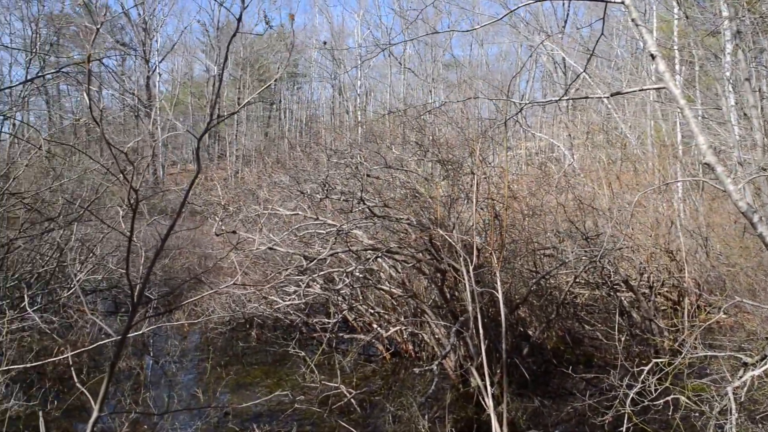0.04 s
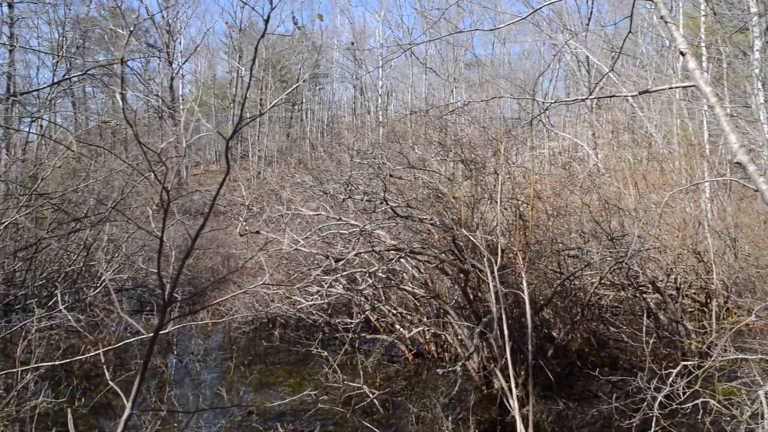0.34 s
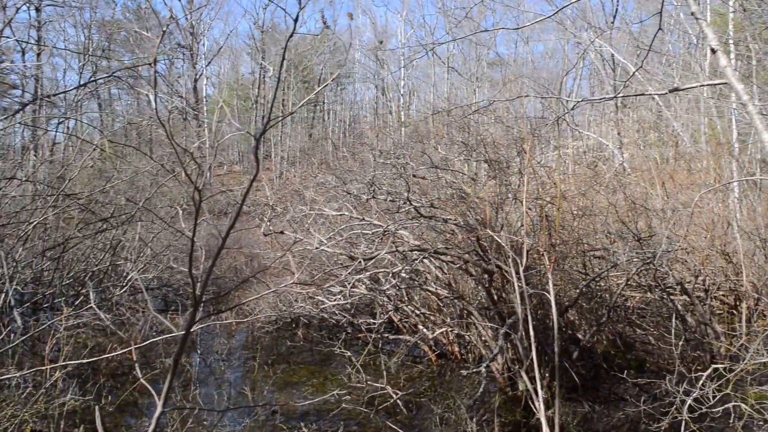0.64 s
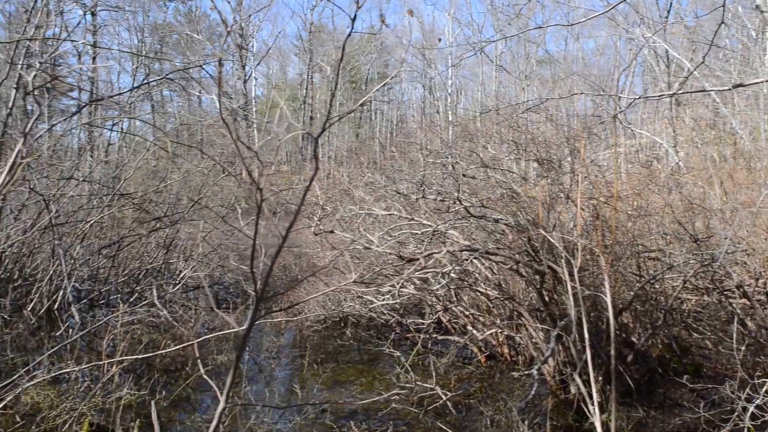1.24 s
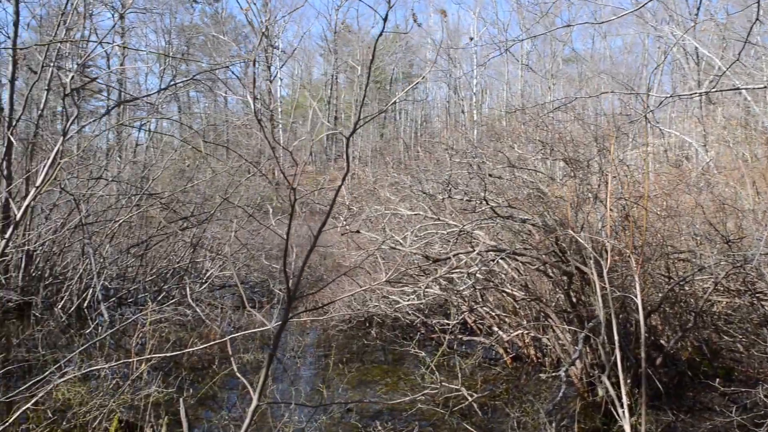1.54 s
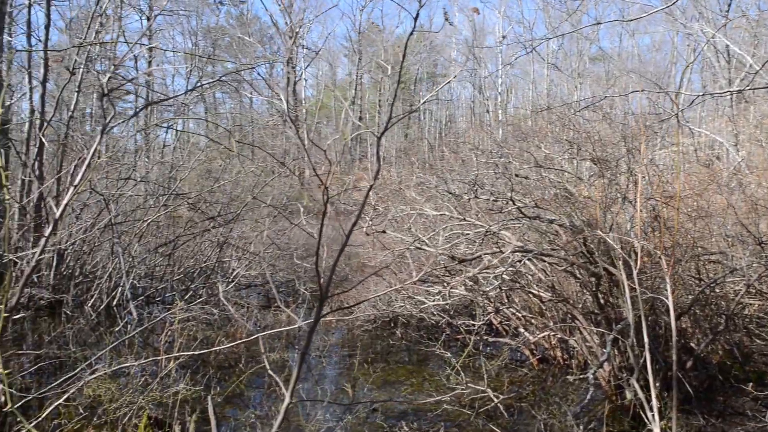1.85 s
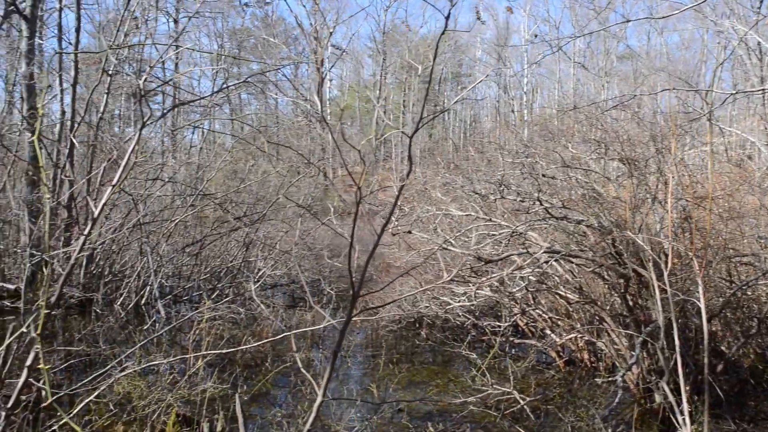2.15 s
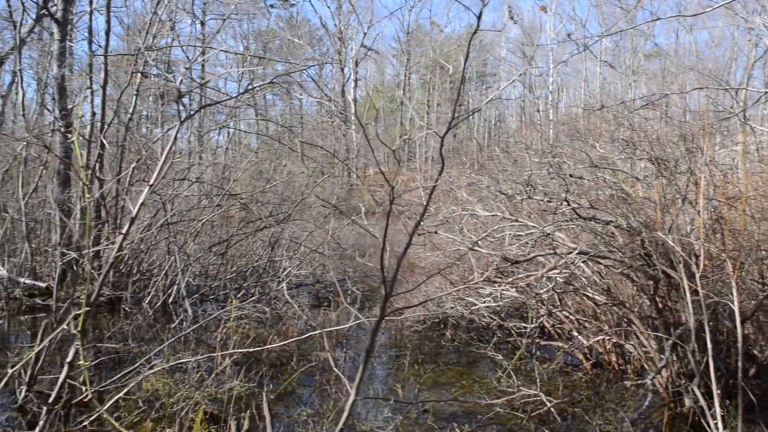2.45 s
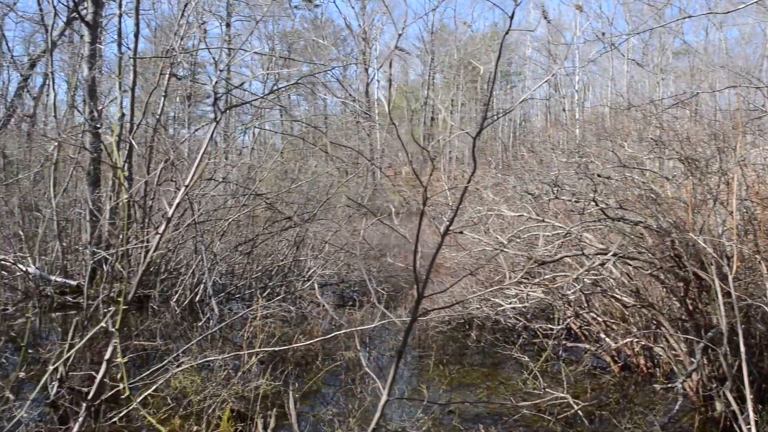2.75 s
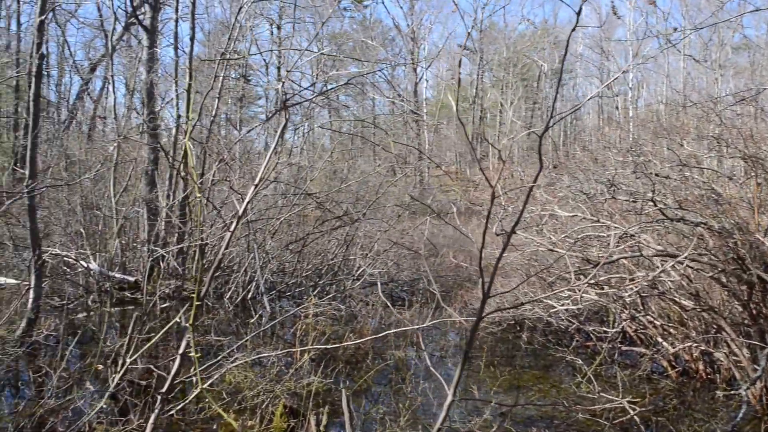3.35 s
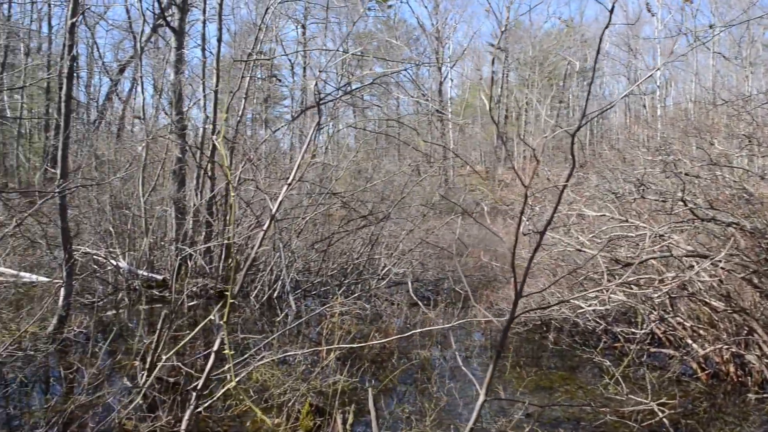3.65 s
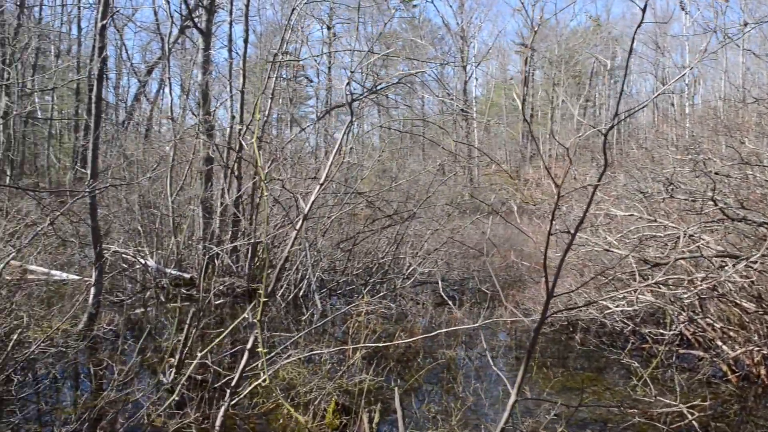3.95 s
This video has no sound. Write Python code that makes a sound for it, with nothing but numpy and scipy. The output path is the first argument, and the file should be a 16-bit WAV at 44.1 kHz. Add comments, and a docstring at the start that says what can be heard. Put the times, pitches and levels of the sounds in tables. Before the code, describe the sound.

Many frogs quack and croak continuously in a woodland pool, close calls overlapping a more distant chorus. A soft microphone bump comes at the start, and a few thin squeaks and faint twig ticks fall among the calls.

```python
"""A chorus of frogs quacks in a woodland pool, with one soft bump on the microphone as it begins.
Each quack is a quickening train of clicks that excites damped resonances: a thin rattle leads in,
the throat rings out, then the vocal sacs swell. Thin squeaks fall among the calls, more frogs call
farther off, and the trees scatter the chorus into reverberation. A few twigs tick, and a faint
rumble and hiss lie underneath."""
import sys
import numpy as np
from scipy import signal
from scipy.fft import rfft, irfft, next_fast_len
from scipy.io import wavfile

SR = 44100
rng = np.random.default_rng(int(sys.argv[2]) if len(sys.argv) > 2 else 0)


def int16_out(signal):
    """Quantize to a 16-bit WAV file."""
    q = np.round(np.clip(np.atleast_2d(signal).T, -1, 1) * 32767)
    wavfile.write(sys.argv[1], SR, q.astype(np.int16))


N = 176400
CALL_T = np.arange(-int(.07 * SR), int(.09 * SR)) / SR  # seconds from a quack's loudest moment
SLOW_HZ, FAST_HZ = 156.08, 390.5  # click rate early and late in a typical quack

# Near quacks, levels relative; the last two resonances are the vocal sacs and the rattle:
# peak_s, length_s, level_db, throat_hz, sac_hz, sac_re_throat_db, rattle_hz, rattle_db
NEAR_QUACKS = [(0.011, 0.034, -34, 1460, 666, -3.5, 4970, -60),
               (0.059, 0.024, -27, 1440, 720, -11.5, 4960, -63),
               (0.106, 0.024, -36, 1680, 830, -1, 5000, -68),
               (0.152, 0.028, -31, 1650, 805, -2.5, 5650, -65),
               (0.19, 0.031, -30.5, 1690, 795, -2.5, 5350, -61),
               (0.245, 0.012, -27.5, 1500, 660, -17, 5200, -60),
               (0.296, 0.015, -28.5, 1390, 784, -7, 4830, -54),
               (0.331, 0.02, -28.5, 1380, 772, -4.5, 5360, -61),
               (0.353, 0.027, -30, 1480, 740, -9, 4860, -61),
               (0.406, 0.019, -33, 1730, 804, -18, 4870, -69),
               (0.48, 0.012, -34, 1520, 785, -0.5, 4900, -64),
               (0.564, 0.012, -26, 1240, 720, -17, 5300, -70),
               (0.587, 0.025, -27.5, 1550, 720, -6, 5550, -60),
               (0.657, 0.015, -26, 1520, 734, -9, 4930, -58),
               (0.686, 0.024, -29.5, 1590, 735, -10.5, 5100, -61),
               (0.727, 0.039, -31, 1580, 767, -10, 5780, -57),
               (0.748, 0.029, -28, 1630, 780, -4.5, 5630, -66),
               (0.768, 0.018, -27, 1580, 770, -13, 5330, -56.5),
               (0.936, 0.028, -30, 1475, 682, 0, 4580, -53.5),
               (0.978, 0.029, -28.5, 1370, 767, -9.5, 5450, -61),
               (1.074, 0.016, -27, 1400, 734, -4, 5000, -58),
               (1.101, 0.025, -32, 1510, 790, -25, 4540, -58),
               (1.139, 0.016, -31, 1330, 617, -11.5, 4800, -60),
               (1.194, 0.021, -27, 1675, 800, -7, 5100, -53.5),
               (1.253, 0.035, -33, 1400, 750, -9, 5460, -61),
               (1.289, 0.021, -26.5, 1530, 780, -10, 5900, -57),
               (1.445, 0.017, -29.5, 1400, 734, -4, 5100, -78),
               (1.476, 0.017, -29, 1400, 665, -3.5, 5000, -57),
               (1.497, 0.023, -29.5, 1540, 785, -4, 5100, -58),
               (1.587, 0.035, -30, 1690, 660, -14, 5450, -67),
               (1.614, 0.025, -29, 1580, 636, -20, 5200, -54.5),
               (1.692, 0.034, -23, 1596, 760, -7.5, 5260, -48),
               (1.741, 0.016, -27.5, 1550, 770, -6, 5460, -62),
               (1.77, 0.018, -32.5, 1350, 760, -17, 5200, -65),
               (1.823, 0.043, -28, 1440, 790, -15, 5060, -64),
               (1.854, 0.037, -32, 1550, 810, -19, 5300, -64),
               (1.874, 0.027, -27.5, 1650, 825, -17, 5700, -58.5),
               (1.944, 0.047, -32.5, 1575, 760, -6, 5400, -66),
               (2.004, 0.014, -30, 1420, 780, -3, 5650, -66),
               (2.073, 0.032, -36.5, 1590, 675, -5.5, 5070, -78),
               (2.18, 0.017, -25.5, 1570, 790, -7, 6140, -56.5),
               (2.206, 0.016, -23.5, 1390, 744, -8, 6140, -53),
               (2.254, 0.022, -22.5, 1510, 810, -6, 5030, -52),
               (2.297, 0.022, -27.5, 1400, 800, -32, 5500, -60),
               (2.366, 0.02, -20.5, 1760, 808, -8.5, 5430, -43.5),
               (2.44, 0.0089, -26.5, 1470, 756, -7, 4900, -53),
               (2.475, 0.066, -35.5, 1570, 800, -7.5, 5320, -64),
               (2.549, 0.063, -34, 1490, 814, -7, 5650, -78),
               (2.623, 0.048, -33.5, 1680, 806, -3, 4800, -61),
               (2.66, 0.022, -24.5, 1590, 794, -6.5, 5960, -51),
               (2.733, 0.037, -28, 1190, 800, -11.5, 5200, -61.5),
               (2.821, 0.04, -30.5, 1580, 740, -7.5, 5230, -60),
               (2.91, 0.039, -26, 1683, 750, -6.5, 6000, -51.5),
               (2.931, 0.012, -31, 1600, 820, -3, 5670, -66),
               (2.968, 0.014, -30.5, 1700, 766, -5, 5040, -57),
               (3.049, 0.076, -32.5, 1610, 794, -10.5, 5400, -66),
               (3.089, 0.02, -23, 1450, 840, -11.5, 5760, -53),
               (3.168, 0.026, -25, 1744, 825, -7.5, 5550, -46),
               (3.22, 0.0091, -28, 1510, 890, -8, 5300, -70), (3.264, 0.013, -32, 1610, 810, -7, 5440, -72),
               (3.301, 0.025, -31, 1985, 805, -9, 5320, -60),
               (3.377, 0.025, -32, 1730, 818, -1.5, 5270, -63),
               (3.471, 0.013, -32.5, 1540, 815, 1.5, 5300, -75),
               (3.513, 0.028, -28.5, 1464, 757, -7, 5970, -57.5),
               (3.579, 0.017, -27, 1635, 837, -6.5, 5500, -52.5),
               (3.608, 0.02, -31, 1670, 750, -7, 5900, -57),
               (3.655, 0.022, -23.5, 1720, 800, -6, 5830, -49),
               (3.723, 0.011, -27, 1810, 830, -6, 5200, -53),
               (3.779, 0.023, -29.5, 1750, 820, -4, 4800, -65),
               (3.885, 0.028, -31, 1690, 784, -1, 5350, -58), (3.975, 0.098, -32, 1500, 750, -5, 5100, -65)]


def near_frogs(echo_t60_s=0.047, echo_db=-9):
    """Early reflections: stems and bank add a short scatter to each close call, its energy held equal."""
    out, t = np.zeros(N), np.arange(SR // 20) / SR
    for peak_s, *voice in NEAR_QUACKS:
        call = quack(*voice)
        scatter = rng.standard_normal(len(t)) * np.exp(-np.log(1000) * t / echo_t60_s)
        echo = signal.fftconvolve(call, scatter / np.linalg.norm(scatter))[:len(call)]
        heard = call + amp(echo_db) * echo
        add(out, peak_s + CALL_T[0], heard * np.linalg.norm(call) / np.linalg.norm(heard))
    return amp(-1.7) * out


def quack(length_s, level_db, throat_hz, sac_hz, sac_re_throat_db, rattle_hz, rattle_db):
    """Source and filter: one quickening click train drives the rattle, the throat and the sacs in turn."""
    quicken_s, quicken_lead_s, click_lead_s, sac_lag_s = .004, 0.002021, .002, 0.0031
    rise_s, fall_s = 0.59 * length_s, 0.74 * length_s
    quickening = (1 + np.tanh((CALL_T + quicken_lead_s) / (2 * quicken_s))) / 2
    rate_hz = (SLOW_HZ + (FAST_HZ - SLOW_HZ) * quickening) * np.exp(.07 * rng.standard_normal())
    times = click_train(rate_hz, -CALL_T[0] - click_lead_s)
    t = times + CALL_T[0] + click_lead_s  # click times from the peak of effort
    force = amp(1.2 * rng.standard_normal(size=128))[:len(t)]
    effort = np.exp(-np.where(t < 0, (t / rise_s) ** 4, np.abs(t / fall_s) ** 1.6))
    inflation = np.interp(t - sac_lag_s, CALL_T, quickening)
    body = throat(times, t, force * effort, throat_hz, inflation)
    sacs = vocal_sacs(times, t - sac_lag_s, force, sac_hz, rise_s, fall_s)
    call = amp(level_db) * (body - amp(sac_re_throat_db) * sacs)
    call += amp(rattle_db + 5) * rattle(times, t, force, effort, rattle_hz)
    return call * np.sqrt(length_s * SR)


def click_train(rate_hz, anchor_s, jitter=.025):
    """Phase is the integral of rate: one click time per slightly uneven cycle, one of them at anchor_s."""
    t, cycles = np.arange(len(rate_hz)) / SR, np.cumsum(rate_hz) / SR
    marks = np.cumsum(1 + jitter * rng.standard_normal(size=128))
    marks = marks - marks[len(marks) // 2] + np.interp(anchor_s, t, cycles)
    return np.interp(marks[(marks > 0) & (marks < cycles[-1])], cycles, t)


def throat(times, t, drive, pitch_hz, inflation, sag_per_s=2.65, sac_damping=1.84):
    """Damped resonance: three modes sag in pitch, and the swelling sacs shorten the main one's ring."""
    hz = pitch_hz * np.exp(-sag_per_s * t)
    main = ring(times, drive, hz, t60_s=0.017 / sac_damping ** inflation)
    chest = ring(times, drive, 0.816 * hz, t60_s=0.0037)
    rasp = ring(times, drive, 1.91 * hz, t60_s=0.0017)
    body = main + amp(-4) * chest - amp(-28) * rasp
    return body / np.linalg.norm(body)


def vocal_sacs(times, t, force, pitch_hz, rise_s, fall_s, sag_per_s=2.86):
    """Driven resonance: the sacs' one low mode swells and fades as its pitch sags."""
    drive = force * swell(t, rise_s, 0.91 * fall_s)
    return ring(times, drive, pitch_hz * np.exp(-sag_per_s * t), t60_s=0.017)


def rattle(times, t, force, effort, pitch_hz, lead_s=0.0032, sag_per_s=.4):
    """Frequency glide: a high mode flicks down as the throat opens; a damped snap edges each click."""
    t = t + lead_s
    lead_in = swell(t, rise_s=0.03, fall_s=0.021)
    depth = .004 + 5.5e-5 * max(pitch_hz - 5520, 0)  # high rattles flick farther
    flick = depth * np.tanh(t / 0.0071)
    stray = .011 * rng.standard_normal(size=128)[:len(t)]  # no two clicks ring quite alike
    tone = ring(times, force * lead_in, pitch_hz * np.exp(stray - flick - sag_per_s * t), t60_s=.0095)
    snap = ring(times, force * np.sqrt(effort * lead_in), hz=3940, t60_s=0.0046)
    return tone + amp(-5) * snap


def ring(times, drive, hz, t60_s, onset_s=.00032):
    """Superposition: each audible click starts a decaying sinusoid; the sum has energy 1."""
    audible = drive > .02 * drive.max()
    times, drive, hz, t60_s = (x[audible, None] for x in np.broadcast_arrays(times, drive, hz, t60_s))
    samples = np.ceil(times * SR).astype(int) + np.arange(int(t60_s.max() * SR))
    age = samples / SR - times
    envelope = np.exp(-np.log(1000) * age / t60_s) * (1 - np.exp(-age / onset_s))
    rings = drive * envelope * np.sin(2 * np.pi * hz * age)
    total = np.bincount(samples.ravel(), rings.ravel(), len(CALL_T))[:len(CALL_T)]
    return total / np.sqrt(np.sum(total ** 2) + 1e-20)


def swell(t, rise_s, fall_s):
    """Envelope: a Gaussian rise to a peak at t = 0, then a fall that becomes exponential."""
    return np.where(t < 0, np.exp(-(t / rise_s) ** 2), 1 / np.cosh(np.clip(2 * t / fall_s, -20, 20)))


# Thin falling squeaks, levels relative: start_s, length_s, start_hz, end_hz, level_db
SQUEAKS = [(1.112, 0.05, 3480, 3040, -53), (1.354, 0.056, 4200, 3610, -61.5),
           (1.406, .052, 3710, 3190, -55.5), (1.548, .055, 3950, 3220, -52.5),
           (1.98, 0.025, 3560, 3460, -55.5), (2.114, 0.028, 3520, 3300, -56.5),
           (2.154, 0.031, 3680, 3380, -55), (2.301, 0.066, 3550, 3110, -52), (2.748, .03, 3770, 3380, -58)]


def squeaks():
    """Amplitude modulation: a narrow falling tone flutters at the slow click rate."""
    out = np.zeros(N)
    for start_s, length_s, start_hz, end_hz, level_db in SQUEAKS:
        t = np.arange(int(length_s * SR)) / SR
        flutter = 1 + 0.42 * np.cos(2 * np.pi * (SLOW_HZ * t + rng.random()))
        phase_drift = .11 * np.cumsum(rng.standard_normal(SR // 4))[:len(t)]
        pitch_hz = start_hz + (end_hz - start_hz) * t / length_s
        tone = np.sin(2 * np.pi * np.cumsum(pitch_hz) / SR + phase_drift)
        add(out, start_s, amp(level_db) * unit_rms(np.sin(np.pi * t / length_s) * flutter * tone))
    return out


def far_frogs(calls_per_s=36):
    """Incoherent sum: the rest of the pool calls at random, blurred by the trees' reverberation."""
    out = np.zeros(N)
    for slot in range(calls_per_s * N // SR):
        level_db, *spread = rng.standard_normal(size=4)
        throat_hz, sac_hz, rattle_hz = np.exp(np.array([.11, .085, .112]) * spread) * [1605, 705, 5250]
        call = quack(0.02, level_db, throat_hz, sac_hz, -7, rattle_hz, level_db - 28.5)
        add(out, (slot + rng.uniform(-1, 1)) / calls_per_s + CALL_T[0], call)
    return amp(-39.2) * unit_rms(out + amp(0.5) * trees(out))


# Reverberation time among the trees: frequency_hz, t60_s
TREE_DECAY = [(500, 0.76), (1500, 0.66), (6000, 0.29)]


def trees(calls, build_s=0.013):
    """Diffuse scattering: the tail dies sooner in the treble; each stretch of calls takes its own paths."""
    out, size = np.zeros(N), SR // 5
    for start in range(0, N, size):
        hz, t, spectrum = signal.stft(rng.standard_normal(SR // 2), SR, nperseg=256)
        decay = amp(-60 * t / curve_at(TREE_DECAY, hz)[:, None])
        tail = signal.istft(spectrum * decay, SR, nperseg=256)[1]
        tail *= 1 - np.exp(-np.arange(len(tail)) / SR / build_s)
        stretch = calls[start:start + size]
        eased = stretch * signal.windows.tukey(len(stretch), .03)
        add(out, start / SR, signal.fftconvolve(eased, tail / np.linalg.norm(tail)))
    return out


# Dry twig ticks close by, levels relative: start_s, level_db
TWIG_TICKS = [(.134, -42), (.38, -41), (.478, -47), (.665, -39), (1.013, -35.5), (1.05, -40), (1.11, -38),
              (2.245, -40), (3.113, -38), (3.826, -38.5)]


def twigs(decay_s=.0014, mean_delay_s=0.019, splinter_db=-6):
    """Broadband transients: each tick is a tiny noise burst trailed by four weaker splinters."""
    out, t = np.zeros(N), np.arange(SR // 50) / SR
    for start_s, level_db in TWIG_TICKS:
        bursts = amp(level_db) / 2 * np.exp(-t / decay_s) * rng.standard_normal(size=(5, len(t)))
        add(out, start_s, bursts[0])
        for splinter in bursts[1:]:
            add(out, start_s + rng.exponential(mean_delay_s), amp(splinter_db) * rng.random() * splinter)
    return coloured(out, [(1000, -18), (4000, 5), (8500, 3), (15000, -6)])


# Low rustle of the handled microphone, before its low cut: time_s, level_db
HANDLING_LEVELS = [(0, -40), (.02, -36), (.04, -51), (.15, -63), (.3, -53), (.44, -52), (.55, -71),
                   (4, -83)]


def handling(bump_s=0.0284, bump_hz=178, width_s=0.0019):
    """Structure-borne noise: a soft bump on the microphone and a brief low rustle."""
    t = np.arange(N) / SR
    age = t - bump_s
    bump = amp(-18) * np.exp(-(age / width_s) ** 2) * np.cos(2 * np.pi * bump_hz * age)
    rustle = noise([(12, -46), (30, 1.0), (55, 0.5), (120, -2), (300, -14), (1000, -40)])
    rustle *= amp(np.interp(t, *np.transpose(HANDLING_LEVELS)))
    low_cut = signal.butter(2, 30, "high", fs=SR, output="sos")
    return signal.sosfilt(low_cut, bump + rustle)


# Spectrum of still air and microphone hiss: frequency_hz, gain_db
AIR_SPECTRUM = [(25, -10), (60, -2.5), (105, 4.5), (140, -5.5), (250, -1.5), (420, -5), (1000, -4),
                (3000, -13.5), (7000, -21), (10000, -24), (15500, -27)]
# Slow swell of the far rumble: time_s, level_db
RUMBLE_LEVELS = [(0, -64), (1.6, -55), (2.7, -51.5), (4, -56.5)]


def noise_floor():
    """Ambient noise: steady air and microphone hiss, with a far rumble that swells a little."""
    air = amp(-49.5) * noise(AIR_SPECTRUM)
    rumble = noise([(40, -23.5), (90, -3), (180, -3.0), (300, -10.5), (700, -33), (2000, -76)])
    return air + amp(np.interp(np.arange(N) / SR, *np.transpose(RUMBLE_LEVELS))) * rumble


def noise(gains):
    """White noise shaped by (frequency_hz, gain_db) points, at unit RMS."""
    return unit_rms(coloured(rng.standard_normal(N), gains))


def coloured(x, gains):
    """Minimum-phase filter through (frequency_hz, gain_db) points."""
    size = 2 * next_fast_len(N // 2 + SR // 8)
    cepstrum = irfft(np.log(amp(curve_at(gains, np.fft.rfftfreq(size, 1 / SR)))), size)
    cepstrum[1:size // 2] *= 2  # folding onto positive time makes the filter causal
    cepstrum[size // 2 + 1:] = 0
    return irfft(rfft(x, size) * np.exp(rfft(cepstrum)), size)[:N]


def curve_at(points, hz):
    """Interpolate (frequency_hz, value) points on a log frequency axis."""
    frequencies, values = np.transpose(points)
    return np.interp(np.log(hz + 1), np.log(frequencies + 1), values)


def amp(db):
    """Decibels to amplitude ratio."""
    return 10 ** (np.asarray(db) / 20)


def unit_rms(x):
    """Scale x to an RMS of 1."""
    return x / np.sqrt(np.mean(x ** 2) + 1e-20)


def add(out, start_s, x):
    """Mix x into out from start_s."""
    start = int(round(start_s * SR))
    first, last = max(start, 0), min(start + len(x), len(out))
    if last > first:
        out[first:last] += x[first - start:last - start]


# Colour of the calls as they leave the water: frequency_hz, gain_db
RADIATION_GAINS = [(200, -26), (450, -42), (560, 1.5), (660, 3.5), (850, 1.5), (1030, -4.5), (1300, 4),
                   (1800, 3), (2300, 2), (3200, 2), (4200, 0.5), (5500, -1), (7000, -2), (12000, -6)]


def scene():
    """Superposition: direct and scattered calls, coloured by radiation, over a quiet background."""
    near = near_frogs() + squeaks()
    chorus = coloured(near + amp(-10.5) * trees(near) + far_frogs(), RADIATION_GAINS)
    return (chorus + noise_floor() + twigs() + handling())[None]


def record(dry, limit_hz=15750):
    """Ideal low-pass filter: the camera keeps nothing above its band limit."""
    size = next_fast_len(N + SR // 4)
    passband = np.fft.rfftfreq(size, 1 / SR) < limit_hz
    return irfft(rfft(dry, size) * passband, size)[..., :N]


dry = scene()
out = record(dry)
int16_out(out)
```